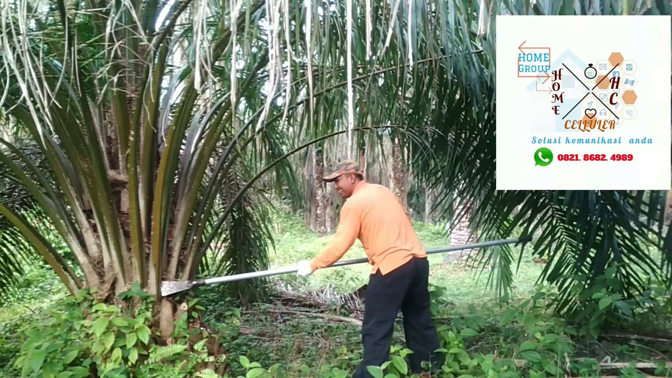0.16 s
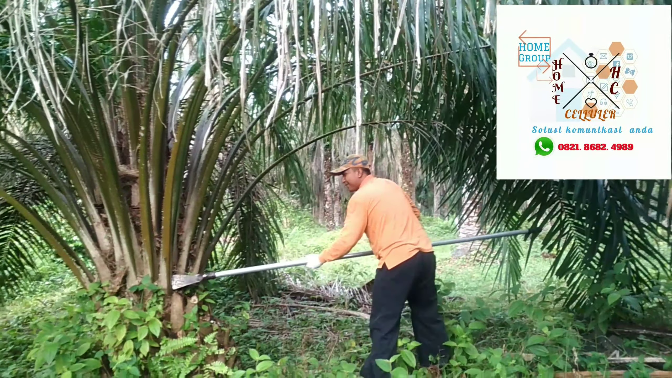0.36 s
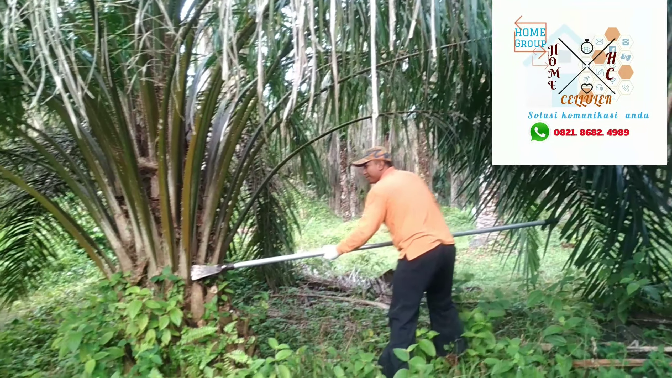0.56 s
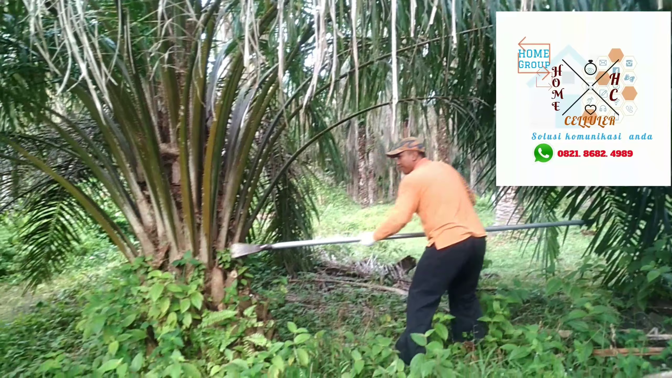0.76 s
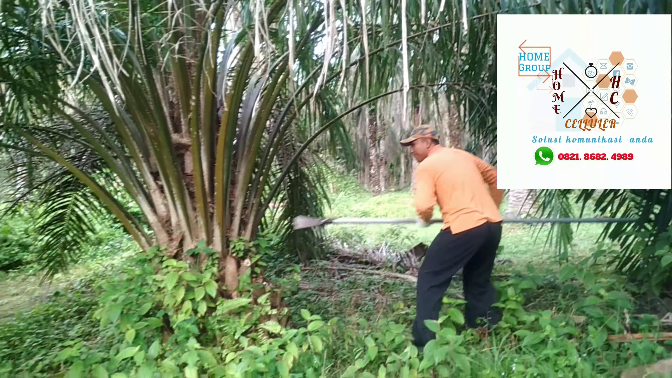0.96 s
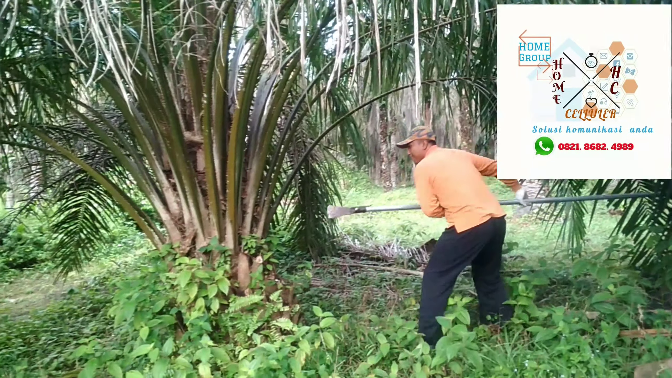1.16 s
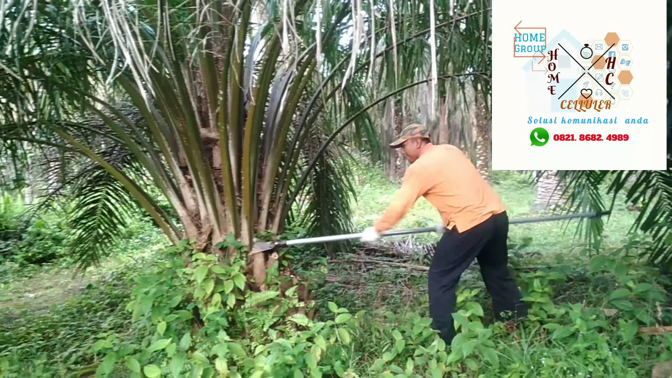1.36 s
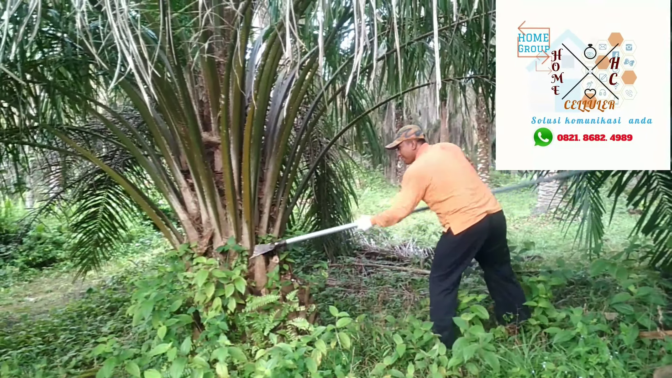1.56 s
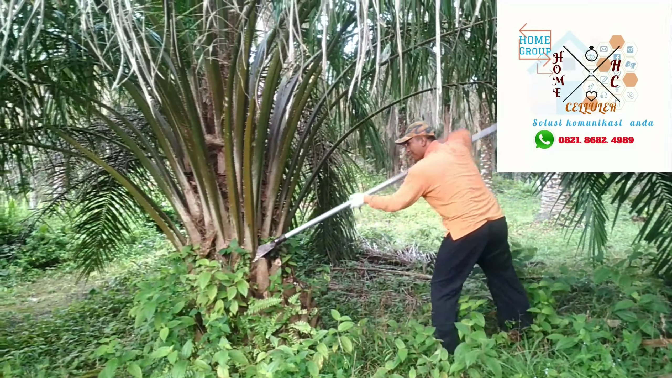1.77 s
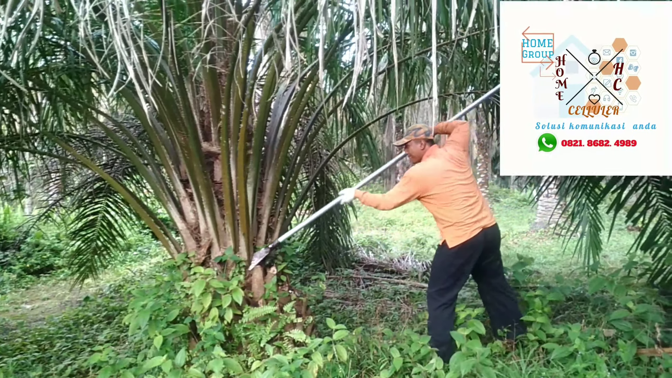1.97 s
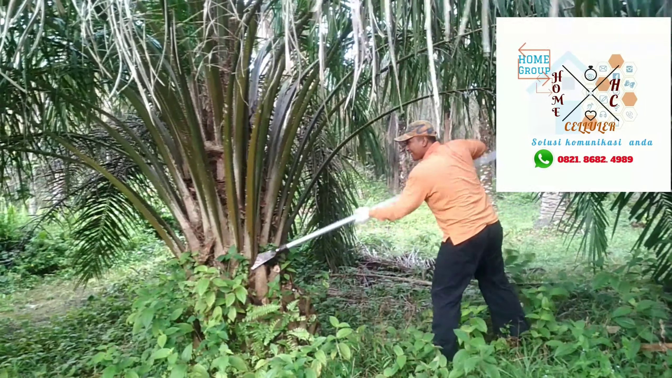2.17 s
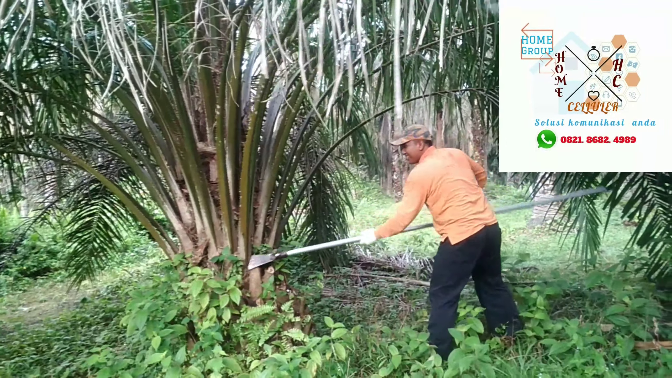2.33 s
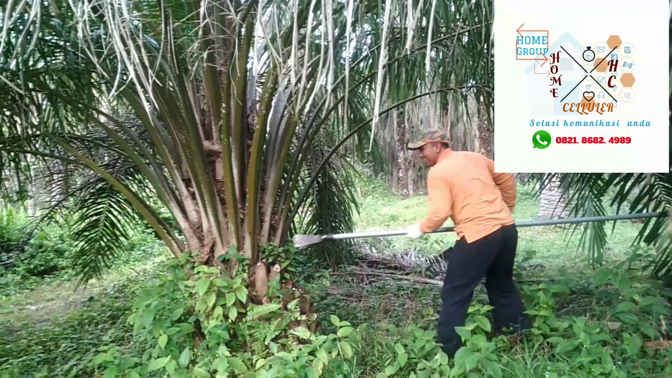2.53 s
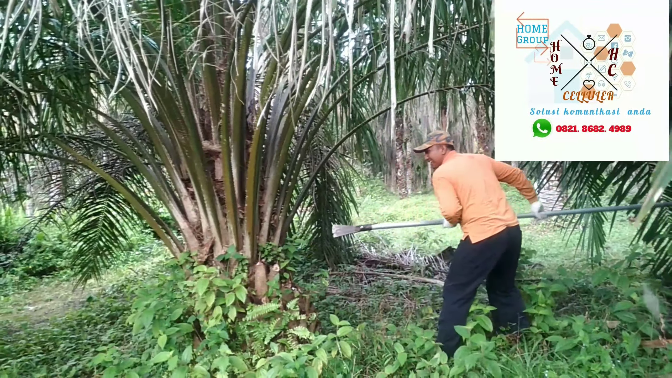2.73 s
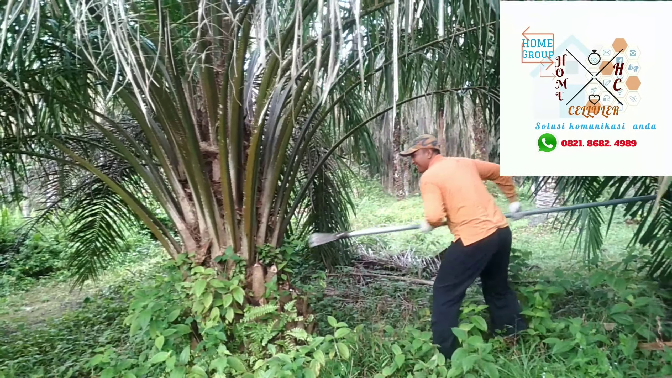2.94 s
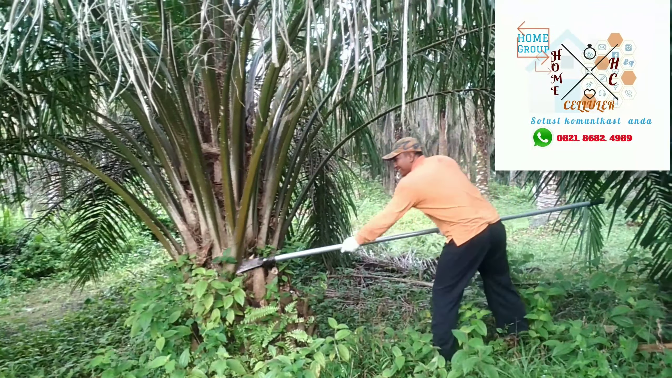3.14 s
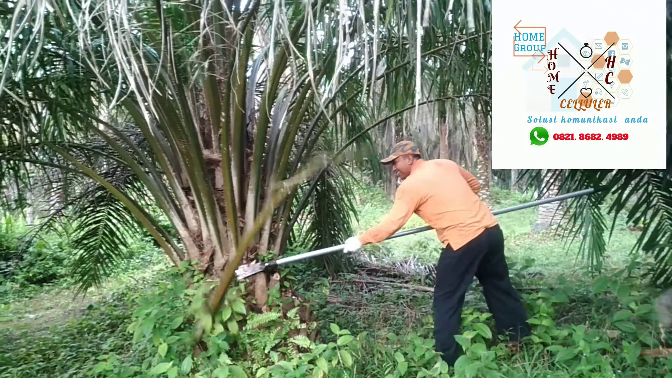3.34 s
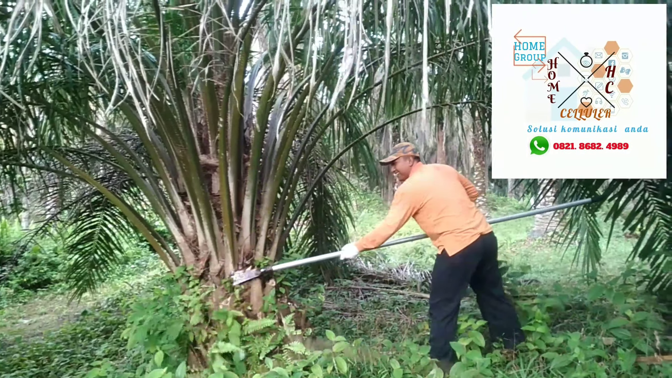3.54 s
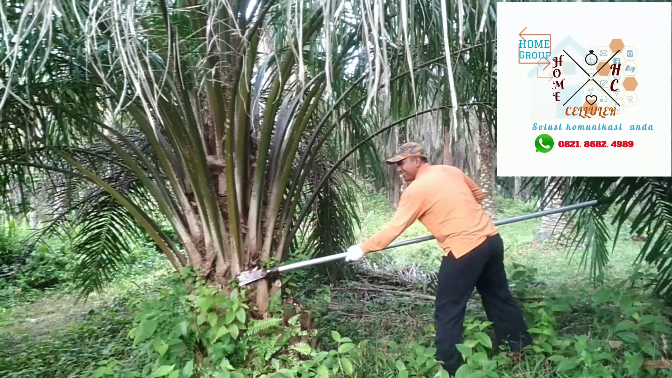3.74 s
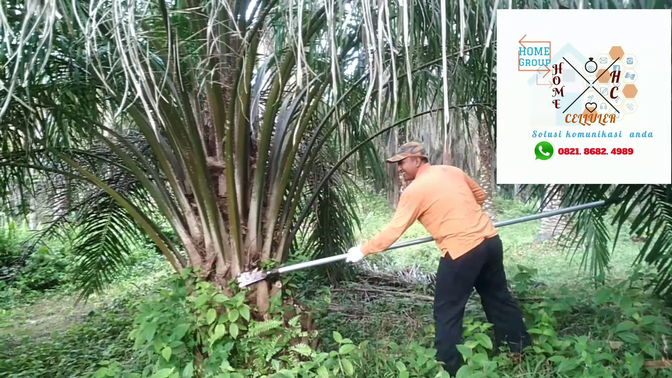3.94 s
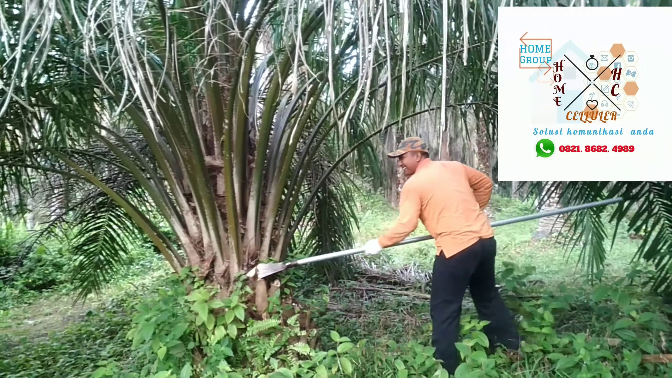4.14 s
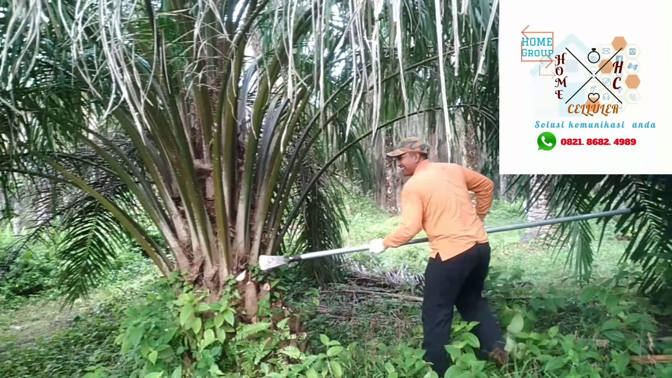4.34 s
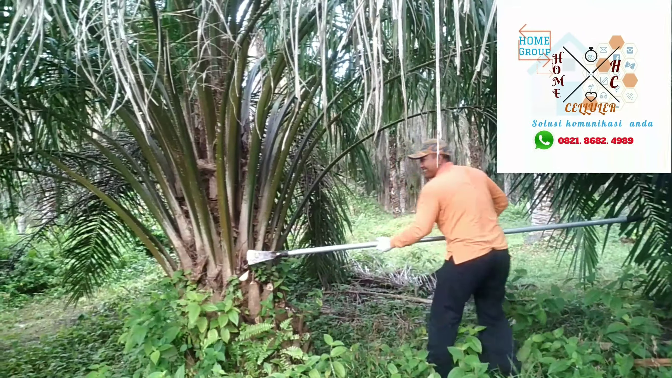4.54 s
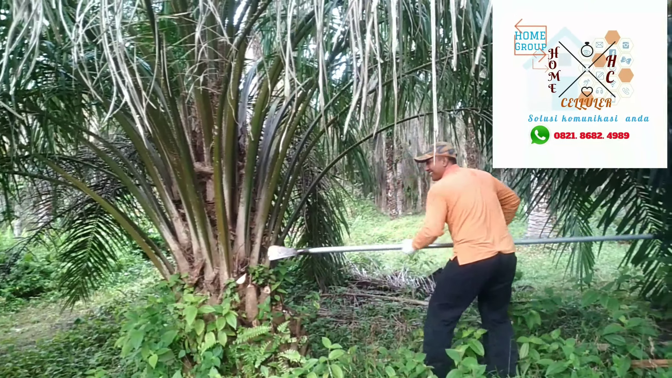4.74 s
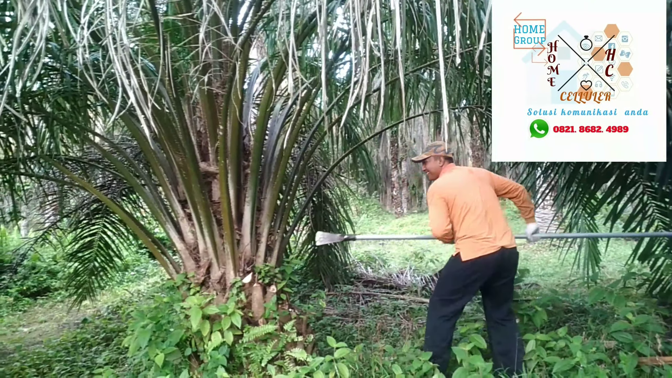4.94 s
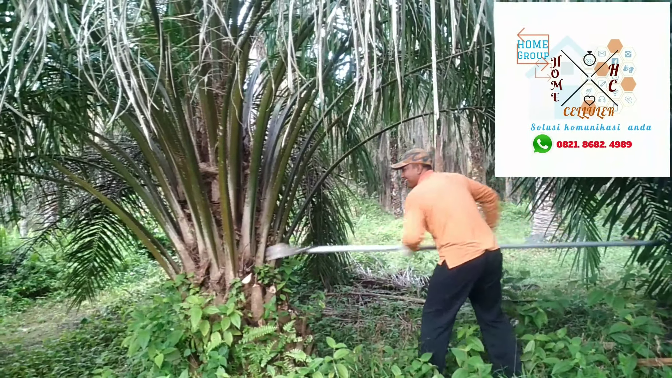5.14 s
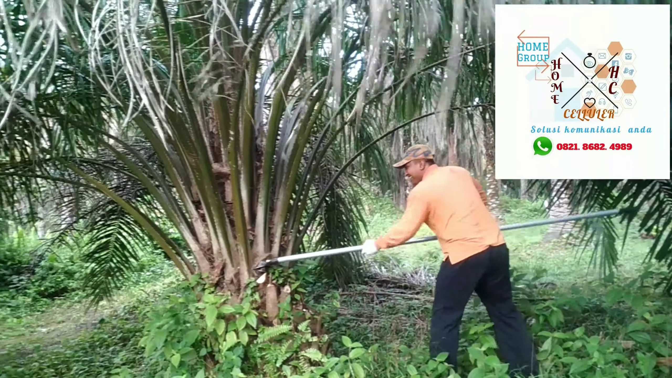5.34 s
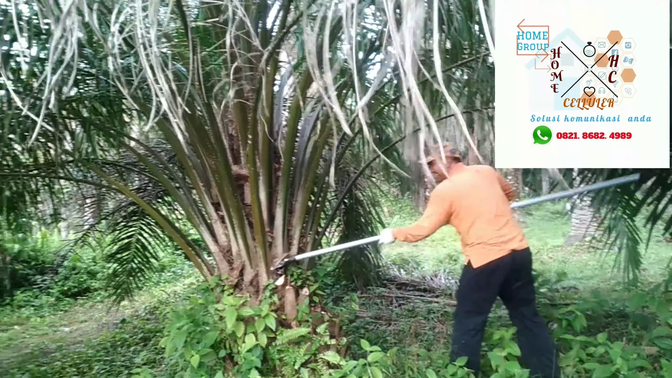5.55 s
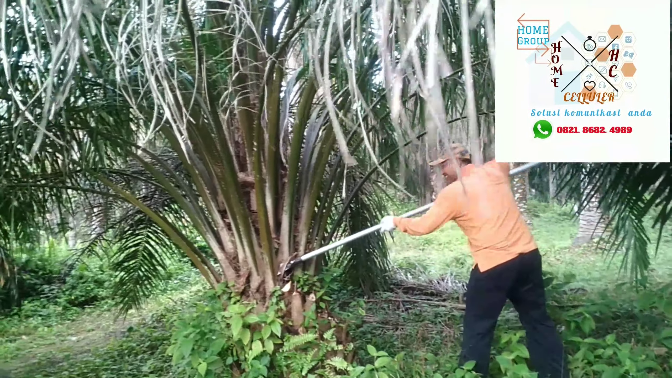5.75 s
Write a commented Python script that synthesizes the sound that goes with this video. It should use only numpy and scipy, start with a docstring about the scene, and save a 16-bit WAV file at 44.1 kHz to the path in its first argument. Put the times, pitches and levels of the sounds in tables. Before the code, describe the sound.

In a palm grove, feet shift in undergrowth before a chisel bites into a woody frond base with a loud crunch that slightly overloads the microphone. A second cut follows, and a frond slides down, rustling and snapping, to land with a heavy thud. Two soft knocks touch the microphone, then a third cut brings more rustling. A far bird trills faintly over a high hiss and light wind.

```python
"""A palm grove: a long-handled chisel is jabbed three times into the woody frond bases.
Each cut is a burst of tearing fibres that rings the stalk; the loudest overload the microphone.
Loosened fronds slide through the crown, rustle, snap and thud to the ground.
Feet shift in the undergrowth and the microphone housing takes two soft knocks.
A far bird trills over a high hiss, distant foliage and light wind."""
import sys
import numpy as np
from scipy import signal
from scipy.fft import rfft, irfft
from scipy.io import wavfile

SR = 44100
rng = np.random.default_rng(int(sys.argv[2]) if len(sys.argv) > 2 else 0)


def materialize(psi):
    """Save the field psi as 16-bit PCM at rate SR to the path in sys.argv[1].

    A 1-D psi becomes a single channel; in a 2-D psi each row is a channel.
    """
    bounded = np.clip(np.atleast_2d(psi).T, -1, 1)
    quanta = np.round(bounded * 32767).astype(np.int16)
    wavfile.write(sys.argv[1], SR, quanta)


N = 260190
T = np.arange(N) / SR
HZ = np.fft.rfftfreq(4096, 1 / SR)  # filter design grid


# chisel cuts: t/s, level/dB, rise/s, tearing/s, t60/s, fibre snaps/(1/s), bass delay/s
CUTS = [(1.5403, 2.5, 0.0062, 0.0079, 0.12, 2800, 0.0015), (3.2139, -4, 0.0035, 0.031, 0.13, 3500, 0.0045),
        (5.375, -5, 0.0022, 0.014, 0.12, 4400, 0.0074)]
# stalk spectrum, one list per cut: f/Hz, level/dB
STALK_SPECTRA = [
    [(41, -120), (70, -22), (243, -1.5), (333, -16), (436, -5.5), (860, -1), (1030, 0), (1260, -6),
     (1550, -4), (1730, -1.5), (5740, -6), (11000, 0.5), (15500, -6.5)],
    [(41, -35), (70, -7), (265, -3), (356, -10.5), (655, -8), (1010, -9), (1230, -12.5), (1580, -9.5),
     (2660, -6.5), (3820, -6), (4900, -11), (11000, -4.5), (15500, -12.5)],
    [(41, -39), (70, -2), (318, -12), (535, 0), (1180, -4), (1940, -3.5), (2170, -2.5), (2380, -2.5),
     (3410, -9), (5870, -11), (7690, -2.5), (13200, -6.5), (15500, -12)],
]
# stalk resonances, one list per cut: f/Hz, width/Hz, weight/dB
STALK_MODES = [
    [(228, 230, -7.5), (438, 30, -8), (600, 160, -1), (1014, 28, -15), (1540, 31, -9), (1890, 38, -30),
     (2360, 79, -14), (2650, 84, -16), (3380, 32, 1), (3910, 40, 1)],
    [(640, 130, -6), (973, 45, 1), (1570, 190, -6), (1790, 25, -2), (2170, 34, -4), (2400, 32, -11),
     (2840, 23, -20), (3000, 34, -10), (3700, 44, -3), (4360, 16, -20)],
    [(861, 37, -21), (1350, 150, -13), (1680, 21, -5), (2176, 36, 0), (2740, 100, 1), (3050, 46, -12),
     (3400, 140, -2), (3440, 53, -10), (3850, 26, -21), (4060, 28, -7)],
]
# cut balance: f/Hz, left-right/dB
CUT_BALANCE = [(150, -2), (500, -1.5), (1050, 5), (2200, 4), (4500, -5.5), (8000, -4.5), (14000, 2)]

def cuts(ring_db=7, bass_hz=650, lowest_hz=135, min_width_hz=45):
    """The blade tears through a bundle of fibres, which ring the wet, well-damped stalk."""
    out, t = np.zeros((2, N)), T[:SR // 2]
    bass_share = 1 / (1 + (HZ / bass_hz) ** 4)
    radiation = HZ ** 3 / (HZ ** 3 + lowest_hz ** 3)
    for cut, spectrum, modes in zip(CUTS, STALK_SPECTRA, STALK_MODES):
        start_s, db, rise_s, tear_s, t60, per_s, bass_delay_s = cut
        ring = sum(amp(weight_db / 2) / (1 + (2 * (HZ - hz) / max(width_hz, min_width_hz)) ** 2)
                   for hz, width_hz, weight_db in modes)
        stalk = evened(amp(curve(spectrum)) * (1 + amp(ring_db) * ring) * radiation)
        # the edge bites at once; the bass swells as the whole stalk gives way
        for share, late_s in ((1 - bass_share, 0), (bass_share, bass_delay_s)):
            attack = np.minimum(t / (rise_s + late_s), 1)
            decay = amp(-60 * np.maximum(t - tear_s - late_s, 0) / t60)
            fibres = crackle(len(t), per_s, spread_db=2.2, grain_s=0.0008, lag_s=0.00005)
            gain = stalk * np.sqrt(share) + 1e-6
            band = colour(attack * decay * fibres, 20 * np.log10(gain), curve(CUT_BALANCE))
            add(out, start_s, amp(db) * np.sqrt(np.mean(gain ** 2)) * band)
    return out


# blows on a frond butt: t/s, peak/dB, contact/s, t60 factor
THUDS = [(1.5559, -5, 0.0023, 2.5), (1.588, -15.5, 0.0028, 1.6), (3.245, -18, 0.0051, 0.56),
         (3.7169, 0, 0.0002, 1.12), (3.851, -7.5, .003, 1.5), (3.872, -13, 0.0028, 1.1),
         (5.399, -16, 0.00058, 1), (5.423, -20, 0.0024, 2.7)]
# butt modes: f/Hz, level/dB, base t60/s
BUTT_MODES = [(127, -40, 0.19), (192.5, -20, 0.15), (238.3, 8, 0.035), (355, 8, 0.019), (430, 4, 0.024),
              (603, 7.5, 0.047), (780, 0, 0.039)]

def thuds(lowest_hz=130):
    """A blow on the heavy, damp frond butt: the longer the contact, the duller the thud."""
    out, t = np.zeros((2, N)), T[:SR // 3]
    radiation = signal.butter(2, lowest_hz, "high", fs=SR)  # a narrow stalk radiates little bass
    for start_s, db, contact_s, t60_factor in THUDS:
        body = sum(amp(mode_db - 60 * t / (t60 * t60_factor)) * np.sin(2 * np.pi * hz * t)
                   for hz, mode_db, t60 in BUTT_MODES)
        force = np.sin(np.pi * np.minimum(t / contact_s, 1))
        blow = signal.lfilter(*radiation, signal.fftconvolve(body, force)[:len(t)])
        add(out, start_s, -amp(db) * blow / abs(blow).max())
    return out


# rustles: first row the fading tail of an earlier chisel cut, the rest sweeping fronds
# peak t/s, leaflets/dB, ribs/dB, stalk/dB (relative levels), 60 dB swell/s, t60/s
RUSTLES = [(0.005, -23, -28, -36.5, 4, 0.21), (0.11, -41, -40, -52.5, .3, 0.45),
           (1.62, -30.5, -36, -44, 0.36, 0.34), (1.8, -36.5, -43, -43.5, 0.5, 0.23),
           (2.295, -22, -23.5, -30.5, 0.37, 0.17), (2.37, -32.5, -33, -38.5, 4, 1.73),
           (2.695, -33, -39, -52, .6, .6), (2.97, -45, -43.5, -57, 2, 0.69),
           (3.295, -24.5, -28, -39.5, 0.02, 0.75), (3.56, -29, -30.5, -50, 0.35, .3),
           (3.65, -26.5, -26, -38.5, 0.9, 0.42), (3.74, -16.5, -21.5, -24.5, .22, 0.25),
           (3.833, -15.5, -41, -31.5, 0.27, 0.31), (3.87, -9, -16.5, -25, 0.25, 0.29),
           (4.0, -34, -37.5, -48.5, 4.5, 0.96), (4.176, -21.5, -25.5, -38.5, 0.2, 0.18),
           (4.21, -33.5, -42, -42, 0, 0.57), (4.41, -40.5, -46.5, -51.5, 5, 2.4),
           (5.28, -43, -40, -48, 0.12, 0.28), (5.424, -17.5, -21.5, -28.5, 0.1059, 0.74),
           (5.54, -23.5, -26, -32, 0.26, 0.79), (5.621, -21.5, -20, -35.5, 0.25, 0.21),
           (5.74, -34.5, -33.5, -41, 1.06, 1.36)]

def rustle_envelopes():
    """Each rustle swells, then settles; overlapping ones add in power."""
    t, power = T[::64], 0
    for peak_s, leaf_db, rib_db, stalk_db, swell_s, t60 in RUSTLES:
        motion_db = -60 * np.maximum((peak_s - t) / swell_s, (t - peak_s) / t60)
        power = power + amp(np.array([[leaf_db], [rib_db], [stalk_db]]) + motion_db) ** 2
    return [np.interp(T, t, np.sqrt(part)) for part in power]


# rib swish spectrum: f/Hz, level/dB
RIB_SPECTRUM = [(900, -15.5), (1600, -11), (2200, -3), (2900, 5), (4000, 0.5), (5500, -5), (9000, -7.5)]
# stalk drag spectrum: f/Hz, level/dB
DRAG_SPECTRUM = [(60, -18), (170, -3.5), (380, -5.5), (620, 1.5), (1000, 0.5), (1500, -1.5), (2400, 0),
                 (5000, -39.5)]
# frond balance: f/Hz, left-right/dB
FROND_BALANCE = [(200, 1), (1100, 0.5), (2200, -1.5), (4200, -9), (8000, -4), (14000, -0.5)]

def fronds():
    """Leaflets rustle and ribs swish while the stalk drags through crown or undergrowth."""
    leaf_env, rib_env, stalk_env = rustle_envelopes()
    balance_db = curve(FROND_BALANCE)
    swish = rib_env * crackle(N, per_s=1000, spread_db=3.2, grain_s=0.002, lag_s=0.0003)
    drag = stalk_env * crackle(N, per_s=1200, spread_db=2.5, grain_s=0.0075, lag_s=0.00026)
    ribs = colour(swish, curve(RIB_SPECTRUM), balance_db)
    stalk = colour(drag, curve(DRAG_SPECTRUM), balance_db)
    return amp(2.5) * leaflets(leaf_env, balance_db) + amp(3.5) * ribs + amp(5) * stalk


# leaflet rustle filter: f/Hz, level/dB
LEAFLET_SPECTRUM = [(2000, -38), (4000, 1), (5200, -4), (6300, -4.5), (7500, 0.5), (9000, -2), (10900, 3.5),
                    (12500, -1), (15500, -4)]

def leaflets(envelope, balance_db, sizes=7):
    """Stiff leaflets flick past one another, each size ticking in its own band."""
    ticks = np.zeros((2, N))
    for hz in np.geomspace(4500, 15000, sizes):
        flicks = crackle(N, per_s=600, spread_db=4, grain_s=0.0015, lag_s=0.0002)
        ticks += np.sqrt(hz) * signal.lfilter(*signal.iirpeak(hz, Q=3.5, fs=SR), flicks)
    return colour(envelope * evened(ticks), curve(LEAFLET_SPECTRUM), balance_db)


# rib snaps: t/s, level/dB, f/Hz, t60/s, left-right/dB
SNAPS = [(.8440, -18, 4500, 0.0087, -9), (1.134, -19.5, 4900, 0.013, -1), (1.732, -20, 11950, 0.043, -5),
         (3.332, -9, 9500, 0.0087, 0), (3.365, -1, 7160, 0.013, -13), (3.538, -10.5, 5940, 0.039, -22),
         (3.558, -11, 9500, 0.028, -19), (3.823, -15, 12000, .016, 0), (3.9357, -0.5, 8900, 0.02, -5),
         (4.023, -14, 5860, 0.025, -15.5), (4.163, -17, 6800, 0.015, -11), (4.177, -9, 5900, 0.0072, -4),
         (4.2155, -7.5, 5960, 0.011, -1), (4.2515, -10.5, 11200, 0.024, 1), (4.713, -28, 2210, 0.17, -1.5),
         (5.4797, -7, 10500, 0.015, 0), (5.484, -5.5, 10800, 0.013, 8), (5.611, -22, 9000, 0.0068, -2),
         (5.6225, -15, 5000, 0.0087, -8), (5.642, -17, 9000, .01, 0)]

def snaps(ring_db=8, width_oct=0.39, rise_s=0.0005):
    """A dry rib breaks: a bright crack with one broad resonance."""
    out, t = np.zeros((2, N)), T[:SR // 8]
    crack_db = curve([(200, 3), (1500, 5.7), (3000, 11), (15000, 17.3)])
    for start_s, db, hz, t60, pan_db in SNAPS:
        burst = noise(len(t), NEAR_CORRELATION) * np.minimum(t / rise_s, 1) * amp(-60 * t / t60)
        resonance_db = ring_db * np.exp(-(np.log2((HZ + 1) / hz) / width_oct) ** 2)
        add(out, start_s, amp(db) * colour(burst, crack_db + resonance_db, pan_db))
    return out


# steps and scuffs: t/s, level/dB, t60/s
STEPS = [(.003, -39, 0.22), (0.1607, -29.5, 0.025), (0.3513, -30.5, 0.056), (0.6263, -29.5, 0.15),
         (0.653, -32.5, 0.16), (0.689, -23, 0.027), (0.7258, -24.5, 0.021), (0.8155, -33.5, .1),
         (0.8435, -34, 0.12), (1.1325, -35.5, 0.039), (1.2897, -36, .08), (1.8, -33, 0.04),
         (1.947, -36, 0.26), (3.171, -38.5, 0.031), (4.196, -26, 0.095)]
# undergrowth crunch spectrum: f/Hz, level/dB
STEP_SPECTRUM = [(60, -14), (120, -3), (220, -2), (450, 1), (750, -3), (1800, -5), (3000, -13.5),
                 (12000, -17)]

def steps(pan_db=5):
    """Plants and twigs crunch dully underfoot."""
    out, t = np.zeros((2, N)), T[:SR // 4]
    for start_s, db, t60 in STEPS:
        crunch = crackle(len(t), per_s=1500, spread_db=1.8, grain_s=0.0008) * amp(-60 * t / t60)
        add(out, start_s, amp(db) * colour(crunch, curve(STEP_SPECTRUM), pan_db))
    return out


# housing knocks: t/s, level/dB, length/s
KNOCKS = [(4.52, -26.5, 0.0128), (4.5392, -18.5, .0035)]

def knocks():
    """A soft knock on its housing pushes the microphone one way and back."""
    out, t = np.zeros((2, N)), T[:SR // 8]
    for start_s, db, length_s in KNOCKS:
        pulse_time = 4 * (t / length_s - 3 / 4)
        add(out, start_s, amp(db) * 2 * pulse_time * np.exp(-pulse_time ** 2))
    return out


# trills: start t/s, end t/s, first rate/(1/s), last rate/(1/s), relative level/dB
TRILLS = [(0.31, 0.786, 20, 20, -53), (0.795, 1.414, 13, 13, -58), (3.012, 3.204, 24, 19, -52),
          (5.009, 5.348, 22, 25, -53)]
# chirp glide at start, middle, end: f/Hz
CHIRP_HZ = [4250, 3675, 3430]

def bird(chirp_s=0.049, pan_db=-7, pitch_spread=0.01, spread_db=4.6):
    """A small bird far to the right sings quick runs of pure, falling chirps."""
    out, t = np.zeros((2, N)), np.arange(0, chirp_s, 1 / SR)
    glide_hz = np.interp(t, np.linspace(0, chirp_s, len(CHIRP_HZ)), CHIRP_HZ)
    for start_s, end_s, first_rate, last_rate, db in TRILLS:
        at_s = start_s
        for detune, effort in rng.standard_normal((32, 2)):
            if at_s < end_s:
                phase = 2 * np.pi * np.cumsum(glide_hz * (1 + pitch_spread * detune)) / SR
                chirp = np.sin(phase) * np.sin(np.pi * t / chirp_s)
                add(out, at_s, 2 * amp(db + spread_db * effort) * sides(pan_db) * chirp)
            at_s += 1 / np.interp(at_s, [start_s, end_s], [first_rate, last_rate])
    return out


# echo decay among the trunks: f/Hz, t60/s
GROVE_T60 = [(150, 0.56), (500, 0.29), (2000, 0.48), (6000, 0.96), (14000, 0.54)]

def grove_echo(x, early_db=3, early_s=0.13):
    """Near trunks scatter the sound quickly; farther ones leave a thin tail."""
    hz, frame_s, spectra = signal.stft(noise(SR, NEAR_CORRELATION), SR, nperseg=256)
    decay = amp(-60 * frame_s / curve(GROVE_T60, hz)[:, None])
    tail = signal.istft(spectra * decay, SR, nperseg=256)[1][:, :SR]
    onset = np.clip(T[:SR] / 0.018 - 0.5, 0, 1)
    early_boost = 1 + amp(early_db) * np.exp(-T[:SR] / early_s)
    response = tail * onset * early_boost
    return signal.fftconvolve(x, response / np.linalg.norm(response[0]), axes=1)[:, :N]


# high hiss spectrum: f/Hz, level/dB
HISS_SPECTRUM = [(2000, -32), (3250, -15), (3600, -0.5), (3980, -6), (4400, 6), (5400, 1.5), (6000, -3.5),
                 (7250, 0), (8300, -13), (9600, -4), (10500, 2), (11400, 4), (12400, -15), (14500, -10)]
# wind buffeting spectrum: f/Hz, level/dB
WIND_SPECTRUM = [(5, 3), (12, 5), (22, -1), (40, -14), (65, -30), (110, -11.5), (200, -43)]
# distant foliage spectrum: f/Hz, level/dB
FOLIAGE_SPECTRUM = [(100, -2.5), (150, -1), (260, -7), (500, -11), (700, -12.5), (1300, -17), (2300, -17.5),
                    (3200, -16), (5000, -35)]
# hiss and foliage balance: f/Hz, left-right/dB
AIR_BALANCE = [(60, -8), (150, 4.5), (380, 0.5), (1290, 3.5), (2380, 3), (4400, -8), (8120, -5), (15000, 5)]
# background stereo likeness: f/Hz, correlation
AIR_CORRELATION = [(30, 1), (120, 0.67), (400, 0.44), (1000, 0.29), (3000, 0)]

def ambience(wind_db=-42, gust_db=0.5, foliage_db=-45.5, hiss_db=-35.5, shimmer_db=0.63):
    """Light wind buffets the microphone under far foliage and a shimmering, insect-like hiss."""
    balance_db = curve(AIR_BALANCE)
    wind_gain = amp(wind_db + gust_db * drift(fastest_hz=2.52))
    wind = colour(noise(N, AIR_CORRELATION), curve(WIND_SPECTRUM))
    foliage = colour(noise(N, AIR_CORRELATION), curve(FOLIAGE_SPECTRUM), balance_db)
    hiss = colour(noise(N, AIR_CORRELATION), curve(HISS_SPECTRUM), balance_db)
    hiss_gain = amp(hiss_db + shimmer_db * drift(fastest_hz=63))
    return wind_gain * wind + amp(foliage_db) * foliage + hiss_gain * hiss


# near-source stereo likeness: f/Hz, correlation
NEAR_CORRELATION = [(100, 0.92), (400, 1), (900, 0.92), (1800, 0.077), (4000, 0.067)]

def crackle(size, per_s, spread_db, grain_s, lag_s=0):
    """Tiny fractures of uneven size, each a noise puff with time constant grain_s; rms 1."""
    fractures = rng.random(size) < per_s / SR
    strength = amp(spread_db * np.minimum(rng.exponential(1, size), 4))
    power = signal.lfilter([1], [1, -np.exp(-2 / (grain_s * SR))], fractures * strength ** 2)
    return evened(np.sqrt(power) * noise(size, NEAR_CORRELATION, lag_s))


def noise(size, correlation, lag_s=0):
    """Stereo white noise, alike in the bass; the right side lags by lag_s."""
    left, independent = rfft(rng.standard_normal((2, size)))
    hz = np.fft.rfftfreq(size, 1 / SR)
    shared = np.clip(curve(correlation, hz), -1, 1)
    right = shared * left + np.sqrt(1 - shared ** 2) * independent
    return irfft([left, right * np.exp(-2j * np.pi * hz * lag_s)], size)


def drift(fastest_hz):
    """Random wander of rms 1."""
    t, rates_hz = T[::256], np.geomspace(fastest_hz / 10, fastest_hz, 20)
    wander = sum(np.sin(2 * np.pi * (hz * t + rng.random())) for hz in rates_hz)
    return np.interp(T, t, evened(wander))


def colour(x, shape_db, balance_db=0):
    """Minimum-phase stereo filter of unit power."""
    gain = amp(np.maximum(shape_db, shape_db.max() - 90)) * sides(balance_db)
    log_gain = np.log(evened(gain))
    mirrored = np.hstack([log_gain, log_gain[:, -2:0:-1]])
    kernel = np.fft.ifft(np.exp(np.conj(signal.hilbert(mirrored)))).real
    return signal.fftconvolve(x, kernel, axes=1)[:, :x.shape[1]]


def curve(points, hz=HZ):
    """Interpolates a table over log frequency."""
    point_hz, value = np.transpose(points)
    return np.interp(np.log(hz + 1), np.log(point_hz + 1), value)


def amp(db):
    """Decibels to gain."""
    return 10 ** (np.asarray(db) / 20)


def evened(x):
    """Scales to rms 1."""
    return x / np.sqrt(np.mean(x ** 2) + 1e-20)


def sides(db):
    """Left and right gains for a level difference."""
    return amp(np.array([[0.5], [-0.5]]) * db)


def add(mix, start_s, sound):
    """Mixes a sound in at start_s."""
    part = mix[:, max(round(start_s * SR), 0):][:, :sound.shape[-1]]
    part += sound[..., :part.shape[1]]


def scene():
    """Blows, snaps and bird echo in the grove; fronds, steps, knocks and background stay dry."""
    blows, cracks, song = cuts() + thuds(), snaps(), bird()
    echoes = grove_echo(amp(-14) * blows + amp(-23) * cracks + amp(-2.5) * song)
    return blows + cracks + song + echoes + fronds() + steps() + knocks() + ambience()


def record(dry, ceiling=0.88, cutoff_hz=15760):
    """Soft microphone overload on the loudest peaks, then a steep low-pass."""
    saturated = dry / (1 + (dry / ceiling) ** 6) ** (1 / 6)
    lowpass = signal.firwin(511, cutoff_hz, window=("kaiser", 8), fs=SR)
    return signal.oaconvolve(saturated, lowpass[None], "same")


dry = scene()
out = record(dry)
materialize(out)
```